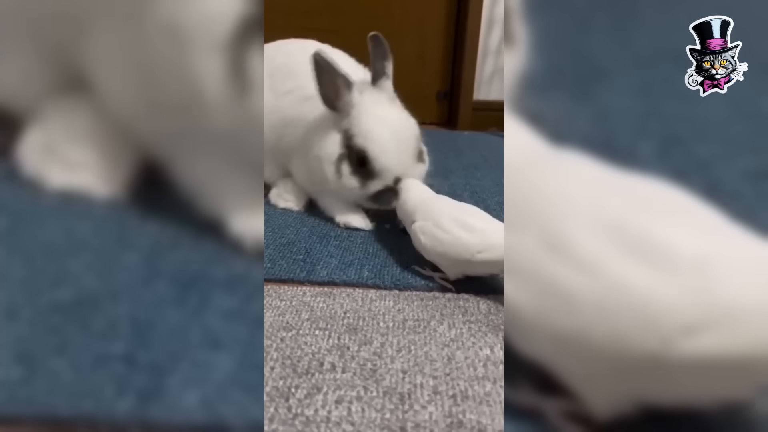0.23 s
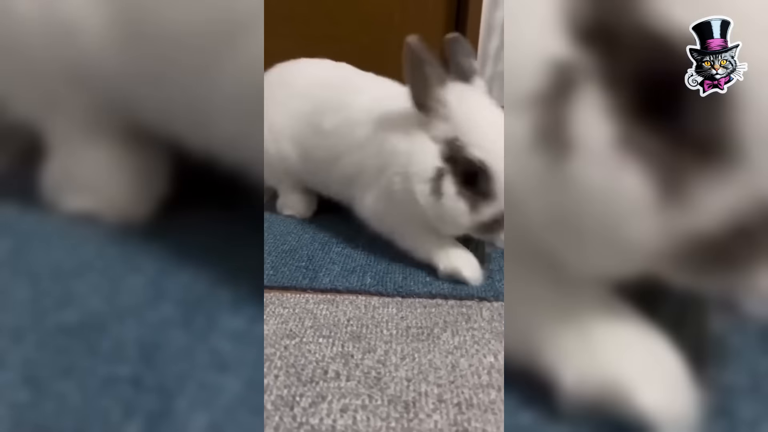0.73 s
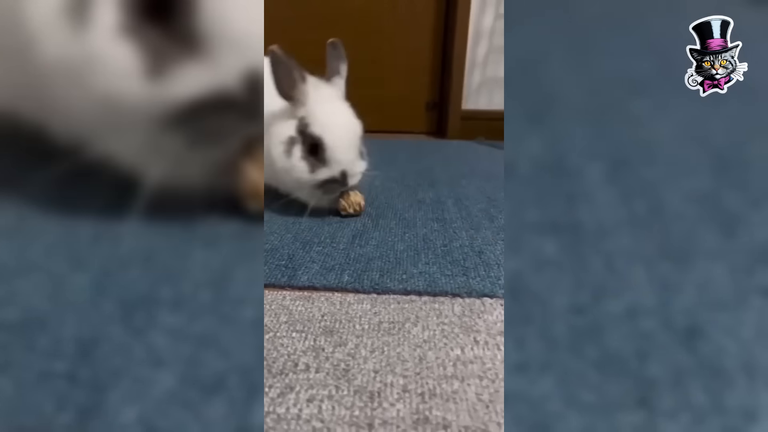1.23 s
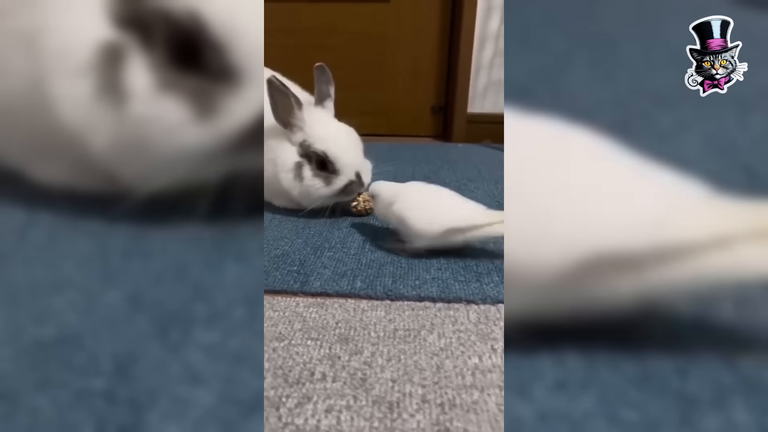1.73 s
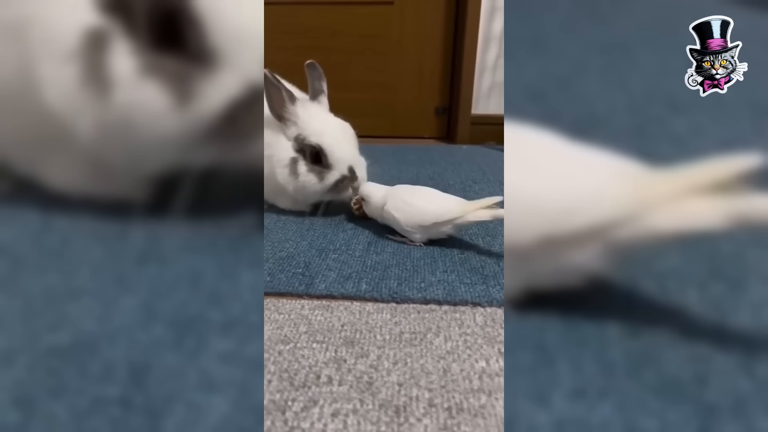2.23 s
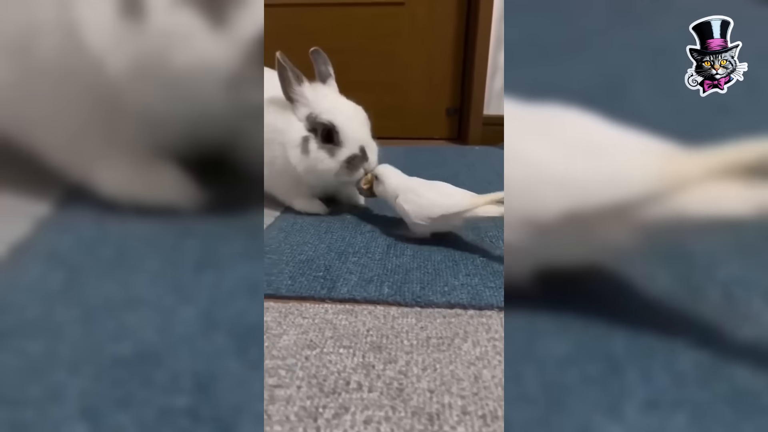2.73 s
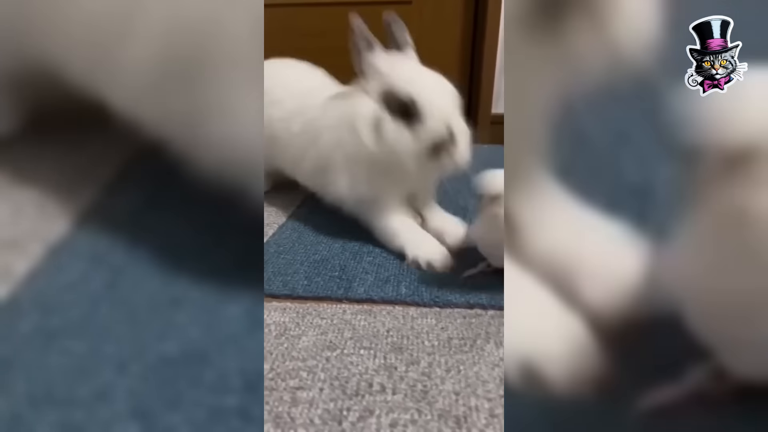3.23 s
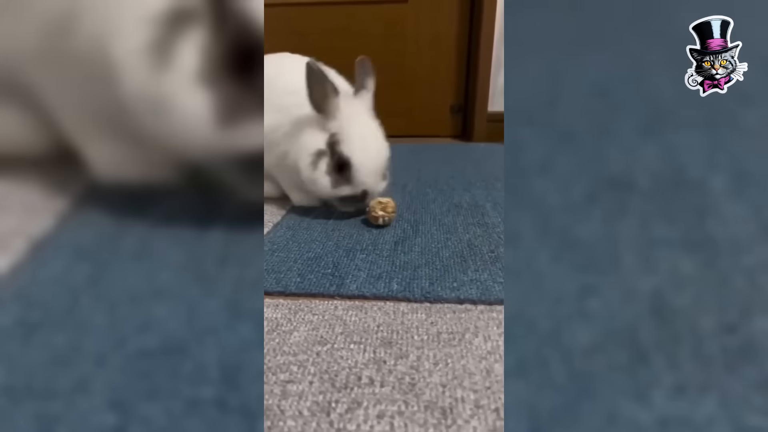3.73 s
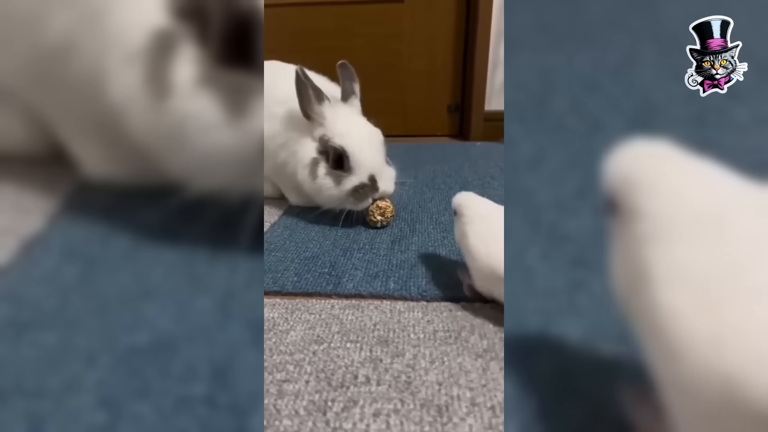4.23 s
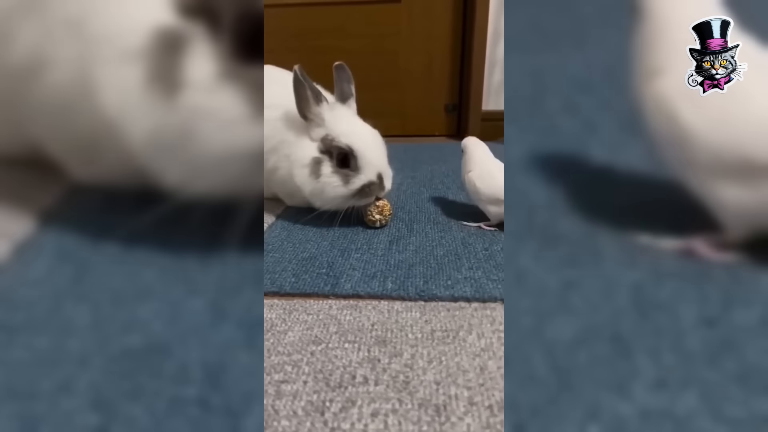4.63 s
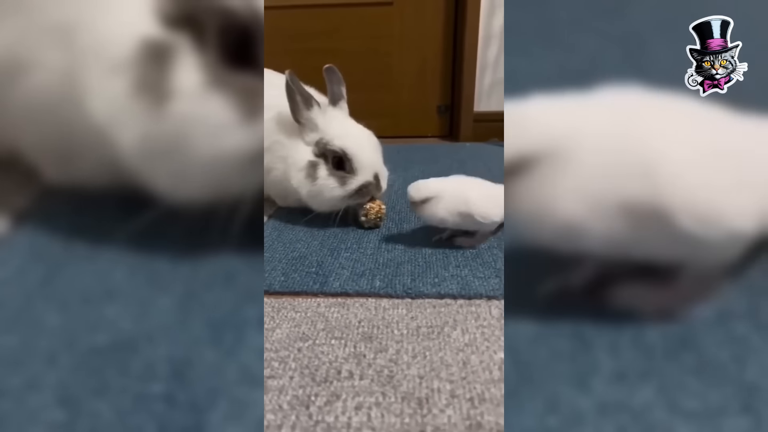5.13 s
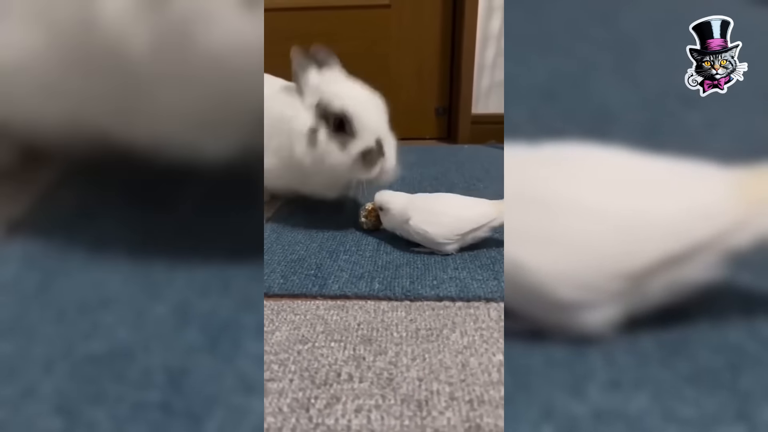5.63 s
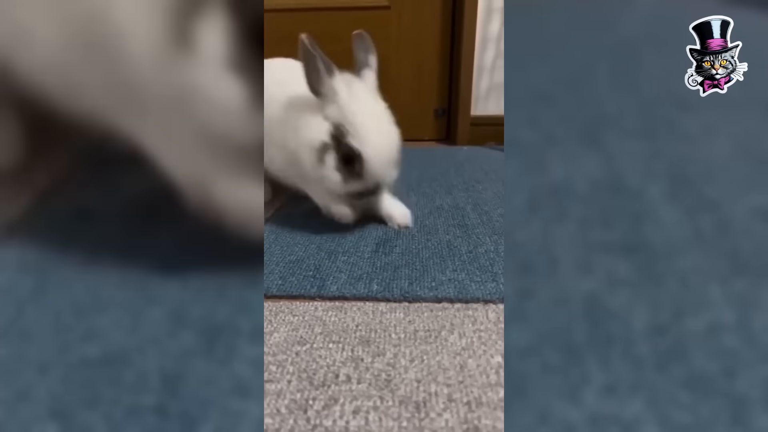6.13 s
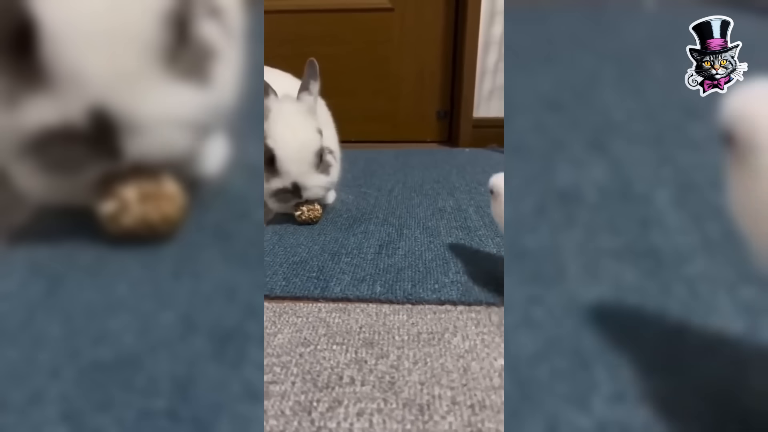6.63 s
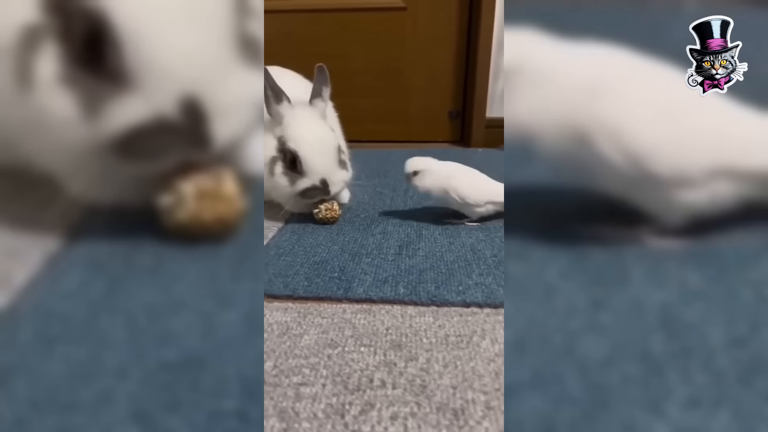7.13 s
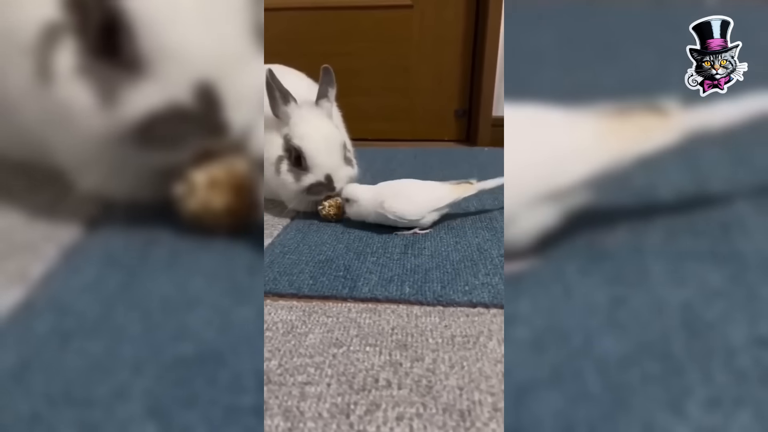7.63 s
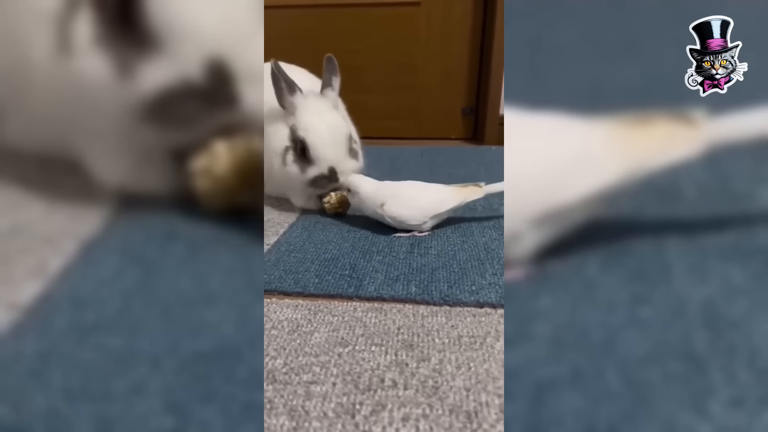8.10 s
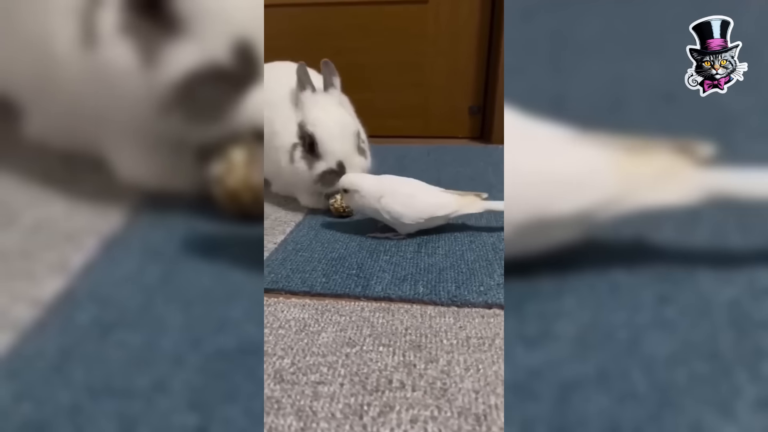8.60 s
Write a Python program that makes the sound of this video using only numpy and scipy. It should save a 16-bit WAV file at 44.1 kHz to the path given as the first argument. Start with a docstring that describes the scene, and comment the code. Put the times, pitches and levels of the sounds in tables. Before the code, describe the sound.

Sparse dry snaps and light padded paw bumps come first, one snap clearly sharper. After a lull, a small bird chatters in short, rough, throbbing chirps, a little right of centre. A crisp crack and fur rustle lead straight into a dull double floor thump, the loudest moment. A few fainter chirps, then quick nibbling cracks. Close stereo microphone, short indoor echo, soft low room rumble.

```python
"""Teeth and beak crack a hard seed ball as a rabbit and a small parrot squabble over it on a carpet.
Noise crumbs around sharp snaps make the cracks; padded pushes on ringing floor modes make the paws,
and the rabbit's lunge ends in two heavy stamps. The bird chatters hoarsely: a throbbing whistle plus
puffed noise in throat, beak and windpipe. Flickering noise bands make the rustle of fur, feathers and
claws; behind it all lie a short room echo and the quiet air of the small room."""
import sys
import numpy as np
from scipy import signal
from scipy.io import wavfile
from scipy.ndimage import uniform_filter1d

SR = 44100
rng = np.random.default_rng(int(sys.argv[2]) if len(sys.argv) > 2 else 0)


def transcribe(signal):
    """Save signal, clipped to [-1, 1], as a 16-bit WAV file at the path in sys.argv[1]."""
    frames = np.atleast_2d(signal).T
    limited = np.clip(frames, -1, 1)
    pcm = np.round(limited * 32767).astype(np.int16)
    wavfile.write(sys.argv[1], SR, pcm)


N = 390806

# Teeth and beak on the ball; thud, crisp and fizz peaks are relative to the body's peak:
# start_s, body_peak_db, thud_db, crisp_db, fizz_db, crumble_ms (time constant, at least 0.5)
BALL_CRACKS = [(.305, -71, 11, -3, -28, 3.1), (.337, -68, 15, -5, -26, 2.9),
               (0.3694, -61.5, -22, -7, -26, 5.9), (0.7314, -45.5, 6.5, -7, -18, 9),
               (1.6212, -46.5, 2.5, -4, -16, 4.8), (1.6541, -53, 0, 4.5, -6, 3),
               (1.694, -21.5, -7, -11, -13.5, 2.1), (1.7065, -29, 1, -13, -10, 0.5),
               (1.7315, -31.5, 2.5, -1.5, -2, 3.3), (1.955, -66, 14, -3, -14, 5.9),
               (2.3134, -56, 11, -1, -3.5, 5.6), (2.353, -60, -3, -6, -24, 2.8),
               (2.3785, -65.5, 16.5, 0, -26, 6.3), (2.9128, -59, -15, -5, -8, 3.3),
               (2.9632, -55, 3, -5, -6, 7.6), (3.1971, -47.5, 11.5, 4.5, -27, 2),
               (3.2675, -30, -3.5, 6, -13, 2.6), (3.6274, -53.5, -6, 3.5, -10, 2),
               (4.785, -43, 4, -4, -29, 3.4), (4.9606, -35.5, -1.5, -14, -2.5, 3.2),
               (5.642, -52, -20, 5, -12, 1.85), (5.686, -42.5, -22, -21, -22, 6.2),
               (5.7443, -18, -27, 1.5, -0.5, 5.8), (5.9599, -47.5, 12, 6, -15, 9.2),
               (6.0931, -49, -22, -4, 3, 4.1), (6.9731, -35, 0, 3, 3, 3.7), (7.2629, -52, 7, -21, -7, 2.4),
               (7.2918, -34, -4, 4, 0.5, 1.7), (7.3417, -41, 3, -18, 0, 5.2),
               (7.3871, -40.5, -19, 0, -4, 5.1), (7.43, -36.5, -3, -22, -10, 2.1),
               (7.4714, -43.5, -24, 4, -4, 2.7), (7.4996, -41, -6, -12, -32, 3.4),
               (7.7711, -47.5, -10, -13, -4.5, 5.4), (7.7927, -42, -3.5, -27, -10, 7.5),
               (7.8183, -35, -3.5, -19.5, -9, 4.4), (7.9274, -32.5, 0.5, -12.5, -34, 1.1),
               (7.9895, -19.5, -5.5, -9, -7, 3), (8.0001, -24.5, -2.5, -1, -0.5, 2.7)]
# Bands in which the ball sounds, in the order thud, body, crisp, fizz: from_hz, to_hz
BALL_BANDS = [(500, 1500), (1500, 3200), (3200, 5700), (6500, 13200)]
# Paws on the floor, push given for a mode right at the centre: middle_s, push_db, centre_hz
PAW_PUSHES = [(0.035, -39, 485), (0.679, -33, 207), (.70, -31, 248), (.715, -26.5, 374), (0.732, -30, 120),
              (1.10, -35.5, 100), (1.574, -42.5, 300), (2.937, -26.5, 146), (3, -34, 124),
              (3.229, -25, 307), (3.237, -28.5, 114), (3.329, -34, 258), (3.399, -30, 254),
              (4.801, -37, 145), (5.694, -35.5, 293), (5.707, -18.5, 284), (5.727, -29, 100),
              (5.767, -23, 208), (5.876, -20, 71.4), (5.964, -15, 456), (5.966, 0.5, 96.5),
              (5.989, -3.5, 84), (5.995, -20.5, 340), (6.01, -13, 118), (6.033, -2, 50.2), (7.801, -39, 99)]
# Ringing modes of the floor: mode_hz, t60_s, left_over_right_db
FLOOR_MODES = [(52.2, 0.09, 3.5), (64, 0.025, -2), (102.4, 0.22, 0), (154, 0.079, 0), (291, 0.077, -4),
               (405, 0.021, -1), (715, 0.018, -4)]
# Bird calls: full_voice_s, attack_db_per_s, hold_s, voice_db, sag_over_hold_db, pitch_hz, glide_hz_per_s,
# clear_share (0-1), throat_db, beak_db, upper_resonance_hz, upper_db, breath_db
BIRD_CALLS = [(4.108, 1105, 0.096, -42.5, 14, 1880, 2002, 0.6, -3, -6.5, 4720, -9, -21),
              (4.25, 480, 0.048, -34.5, 9, 1680, 100.5, 0.6, -17, -13, 3430, -18.5, -25.5),
              (4.434, 450.5, 0.035, -43, 15, 1600, -1500, 0.6, -9, -8, 3750, -16, -22.5),
              (4.57, 704, 0.029, -47.5, 2, 2130, -5000, 0.05, -4.5, -2.5, 3330, -14.5, -24.5),
              (4.716, 550, 0.033, -53, 0, 1660, -10000, 0.61, -3.5, -3.5, 3120, -20.5, -23),
              (4.82, 600.5, 0.096, -40.5, 10.5, 2035, 96.5, .1, -4, -4, 3337, -15, -14),
              (5.102, 1500, 0.034, -47.5, -3.5, 1760, 94, 0.7, -13, -8, 3430, -8, -19),
              (5.138, 609, 0.084, -35, 13, 1773, -1300, 0.53, -20.5, -17.5, 3550, -22.5, -23.5),
              (5.254, 900, 0.014, -41, 1.5, 2150, -4000, 0.1, -11.5, -4, 3410, -23, -31),
              (5.289, 396, 0.059, -37, 9, 1760, -1500, 0.47, -16, -10, 3430, -12, -25.5),
              (6.664, 1000, 0.027, -58.5, -3, 2256, 99.5, .4, -1, -12.5, 3550, -10, -19.5),
              (6.71, 400, 0.087, -49, 8, 2200, 607, 0.6, -4, -9, 3235, -8.5, -16),
              (6.858, 453, 0.026, -38.5, 8, 1340, -600, .7, -11, -6.5, 3660, -14, -22)]
# Airy resonances of the bird's breath: centre_hz, width_hz, level_db
BREATH_RESONANCES = [(7230, 1140, 6.5), (9330, 970, 2), (10900, 3700, -1)]
# Fur, feathers and claws brushing the carpet: full_strength_s, hold_s, level_db, sag_over_hold_db, treble_db
BRUSH_STROKES = [(0.361, 0.026, -73, 4, -13), (0.741, 0.0059, -50.5, 2, -8.5), (.95, 0.21, -76.5, -3, -3.5),
                 (1.718, 0.045, -50, 8.5, -1), (1.96, 0.016, -69, 3, -5), (2.334, 0.035, -68.5, 0.5, -5),
                 (2.55, .25, -72, -0.5, -6), (2.929, 0.058, -66.5, -0.5, -0.5),
                 (3.21, 0.12, -59, 4.5, -2.5), (3.353, 0.15, -69, 2.5, -0.5),
                 (5.537, 0.26, -63.5, 14, -20.5), (5.696, .02, -55, 3, -10.5),
                 (5.745, 0.033, -39.5, 2.5, 2), (5.862, 0.023, -52, 3.5, 2), (5.936, 0.073, -52, 5, 1),
                 (6.032, 0.083, -55.5, 3, 1), (6.156, 0.13, -71, 10.5, -5.5),
                 (6.983, 0.095, -60, 14.5, -5.5), (7.278, .08, -54, -2.5, -3), (7.415, 0.093, -67, -1.5, 1),
                 (7.777, 0.073, -58, -1.5, -5.5), (8.02, 0.028, -60.5, 8, 0), (8.189, 0.034, -75, -1, -4),
                 (8.51, 0.022, -79, 1, -3.5), (8.856, 0.017, -61, 9, -0.5)]
# Colour of the brushing, before scaling to rms 1: frequency_hz, density_db_per_hz
BRUSH_SPECTRUM = [(290, -31), (500, -2), (653, 4.5), (1190, -5.5), (1560, -1.5), (5130, -7), (6330, -5),
                  (12600, -20), (13500, -10.5), (14300, -78)]
# Colour of the room tone, before scaling to rms 1: frequency_hz, density_db_per_hz
AIR_SPECTRUM = [(13, -41), (22, -14.5), (69, -0.5), (132, -13), (313, -6.5), (349, -9), (470, -15),
                (538, -16.5), (1280, -36.5), (2090, -37.5), (3220, -78), (5390, -36), (6170, -56),
                (6880, -50.5), (14300, -66.5)]
# Course of the room tone: time_s, level_db, deep_rumble_db
AIR_COURSE = [(0, -54, 3), (6.7, -53.5, 3), (6.9, -53.5, -10), (7.1, -57, -3), (7.7, -61.5, 5),
              (7.9, -57, 5.5), (8.86, -53.5, 3)]
# How alike the room tone is in both ears: frequency_hz, likeness (1 = identical)
EAR_LIKENESS = [(60, 1.0), (180, 0.98), (530, 0.66), (1570, 0.29), (4660, 0.53), (13800, 0.39)]
# Side to which rustle and room tone lean: frequency_hz, left_over_right_db
EAR_LEAN = [(60, 0.0), (180, 0.0), (530, 0.0), (1570, -2.5), (4660, 0.5), (13800, 0.0)]

BALL_PAN_DB = -1.5   # pans are left over right

THROB_HZ, BUZZ_HZ = 64.8, 171.6
CALL_RELEASE_DB_PER_S = 799.5
THROAT_FADE_DB_PER_S = 119   # the throat rasp thins as a call goes on
THROAT, BEAK = (1300, 670), (2250, 400)   # resonances: centre_hz, width_hz
WINDPIPE_WIDTH_HZ = 320
ROAM = .05   # spread, as a share, of the wandering resonances
BIRD_PAN_DB, BIRD_TREBLE_PAN_DB, BIRD_SPLIT_HZ = -3, 0.5, 2400   # low voice to the right, treble a touch left

BRUSH_ATTACK_DB_PER_S, BRUSH_RELEASE_DB_PER_S = 471.5, 326
FIDGET_DB, FIDGET_SWING_DB, FIDGET_TREBLE_DB = -86, 2.5, -0.5   # the animals never sit quite still
RUSTLE_FLICKER_DB, AIR_FLICKER_DB = 2.5, 1.5
BRUSH_TOP_HZ = 13200

ROOM_T60_S = .19
ROOM_DB, BIRD_ROOM_DB = -11, -6.5   # echo of the close sounds, echo of the bird
CUTOFF_HZ = 14449


def cracks():
    """The seed crust crumbles under rising pressure, snaps, and crumbles out."""
    out, lead, n = np.zeros((2, N)), 600, 2600   # samples before the snap, samples in all
    ms = 1000 * (np.arange(n) - lead) / SR
    for s, body_db, thud_db, crisp_db, fizz_db, crumble_ms in BALL_CRACKS:
        crumble_ms = max(crumble_ms, .5)
        crumbs = rng.standard_normal((3, n)) * from_db(7.34 * rng.standard_normal(n))
        shape = np.exp(np.where(ms < 0, ms / (0.59 * crumble_ms), -ms / crumble_ms))
        # crumbs scatter a little between the ears
        splinter = 0.21 * shape * (crumbs[0] + 0.22 * crumbs[1:])
        splinter[:, lead] = 1   # the snap itself
        parts = [band(splinter, *edges) for edges in BALL_BANDS]
        levels_db = [thud_db, 0, crisp_db, fizz_db]
        snap = sum(from_db(db) * part / np.abs(part).max() for db, part in zip(levels_db, parts))
        at = round(s * SR) - lead
        out[:, at:at + n] += panned(from_db(body_db) * snap, BALL_PAN_DB)[:, :N - at]
    return out


def paws():
    """A padded paw presses for about one cycle of the modes it stirs: heavy pushes are slow and deep."""
    out = np.zeros((2, N))
    for hz, t60, pan_db in FLOOR_MODES:
        pushes = np.zeros(N)
        for s, push_db, centre_hz in PAW_PUSHES:
            pad = np.hanning(round(.7 * SR / max(centre_hz, hz)))
            at = round(s * SR) - len(pad) // 2
            # modes far from the paw's centre are stirred less
            octaves_off = np.abs(np.log2(hz / centre_hz))
            strength = from_db(push_db - 14.8 * octaves_off ** 1.2)
            pushes[at:at + len(pad)] -= pad / pad.sum() * strength
        out += panned(ring(pushes, hz, t60), pan_db)
    return out


def chatter():
    """An unsteady whistle that throbs, and a buzzy rasp in the resonances of throat, beak and windpipe."""
    calls = loudest(BIRD_CALLS, CALL_RELEASE_DB_PER_S)
    voice_db, age, hz, glide, clear, throat_db, beak_db, upper_hz, upper_db, breath_db = calls
    clear = np.clip(clear, 0, 1)
    glide_age = np.maximum(age, -.04)
    hz = hz + glide * glide_age
    throat_db = throat_db - THROAT_FADE_DB_PER_S * glide_age
    # the syrinx flutters: the whistle swells and chokes many times a second
    phase = cycling(hz, .012, 60)
    throb = 1 + 0.35 * np.sin(cycling(THROB_HZ, 0.22, 8))
    harmonics = np.sin(phase) + 0.07 * np.sin(2 * phase) + 0.03 * np.sin(3 * phase)
    whistle = rms_one(throb * harmonics)
    # its membranes slap shut and chop the air into puffs, which stacks fine lines around each resonance
    puffs = rms_one(np.exp(.55 * np.cos(cycling(BUZZ_HZ, .2, 25))))
    roam = 1 + ROAM * drift(8)
    hoarse = np.sqrt(1 - clear) * wavering(hz, 250)   # noise around the pitch
    throat = from_db(throat_db) * wavering(THROAT[0] * roam, THROAT[1])
    beak = from_db(beak_db) * wavering(BEAK[0] / roam, BEAK[1])
    windpipe = wavering(upper_hz * roam, WINDPIPE_WIDTH_HZ) + 0.71 * wavering(4250, 2660)
    rasp = puffs * (hoarse + throat + beak + from_db(upper_db) * windpipe)
    breath = rms_one(sum(from_db(db) * wavering(f, width) for f, width, db in BREATH_RESONANCES))
    grit = from_db(2.0 * drift(60))
    voice = np.sqrt(clear) * whistle + grit * (rasp + from_db(breath_db) * breath)
    voice = from_db(voice_db) * voice
    low_voice = panned(band(voice, 300, BIRD_SPLIT_HZ), BIRD_PAN_DB)
    treble = panned(band(voice, BIRD_SPLIT_HZ, 14000), BIRD_TREBLE_PAN_DB)
    return low_voice - treble


def rustle():
    """Patchy brushing, gritty where hairs and claws catch the pile."""
    strokes = [(s, BRUSH_ATTACK_DB_PER_S, *rest) for s, *rest in BRUSH_STROKES]
    level_db, _, treble_db = loudest(strokes, BRUSH_RELEASE_DB_PER_S)
    # between strokes a faint fidgeting remains
    treble_db = np.where(level_db > FIDGET_DB, treble_db, FIDGET_TREBLE_DB)
    level_db = np.maximum(level_db, FIDGET_DB + FIDGET_SWING_DB * drift(2.6))
    brush = banded_noise(BRUSH_SPECTRUM, RUSTLE_FLICKER_DB, 6000, 0, treble_db, lambda hz: .7)
    brush = signal.sosfilt(signal.butter(12, BRUSH_TOP_HZ, fs=SR, output="sos"), brush)
    catches = from_db(2.2 * drift(150))
    return from_db(level_db) * rms_one(brush * catches)


def room(x):
    """A dying noise for each ear stands for the many wall echoes."""
    t = np.arange(round(ROOM_T60_S * SR)) / SR
    tail = band(rng.standard_normal((2, len(t))), 200, 11000)
    tail *= from_db(-60 * t / ROOM_T60_S) * (t > .003)   # the first echo waits 3 ms
    tail /= np.sqrt(np.sum(tail ** 2, axis=1, keepdims=True))
    return from_db(ROOM_DB) * signal.fftconvolve(x, tail, axes=1)[:, :N]


def room_tone():
    """Ventilation and building rumble with a faint hiss, as flickering noise bands."""
    level_db, deep_db = in_time(AIR_COURSE)
    air = banded_noise(AIR_SPECTRUM, AIR_FLICKER_DB, 140, deep_db, 0, lambda hz: at_hz(EAR_LIKENESS, hz))
    return from_db(level_db) * air


def banded_noise(spectrum, patchy_db, split_hz, below_db, above_db, alike_at):
    """Half-octave bands of stereo noise, each flickering on its own; one gain below the split, one above."""
    out, edges = 0, 22 * 2 ** np.arange(0, 9.6, .5)
    white = rng.standard_normal((2, 2, N))
    sides = np.array([[1], [-1]])
    for k, (low, high) in enumerate(zip(edges, edges[1:])):
        hz = np.sqrt(low * high)
        if hz < spectrum[0][0]:
            continue
        mid, side = band(white[k % 2], low, high)   # neighbouring bands use separate noise
        alike = np.clip(alike_at(hz), -1, 1)
        split_db = below_db if hz < split_hz else above_db
        gain = from_db(at_hz(spectrum, hz) + patchy_db * drift(30) + split_db)
        pair = np.sqrt(1 + alike) * mid + np.sqrt(1 - alike) * side * sides
        out = out + gain * pair * from_db(at_hz(EAR_LEAN, hz) / 2 * sides)
    return rms_one(out)


def loudest(rows, fall_db_per_s):
    """Attack, sagging hold, release for every row; the loudest row of the moment gives level, age and columns."""
    s, rise, hold, db, sag_db, *columns = np.transpose(rows)[:, :, None]
    t = np.arange(0, N + 32, 32) / SR   # one step per 32 samples
    age, hold = t - s, np.maximum(hold, .002)
    attack = rise * np.minimum(age, 0)
    sag = sag_db * np.clip(age / hold, 0, 1)
    release = fall_db_per_s * np.maximum(age - hold, 0)
    level = db + attack - sag - release
    top, step = level.argmax(axis=0), np.arange(len(t))
    held_age = np.minimum(age, hold)
    slow = [level[top, step], held_age[top, step], *[c[top, 0] for c in columns]]
    # smoothing softens the jump from row to row
    return [np.interp(np.arange(N) / SR, t, uniform_filter1d(c, size=7)) for c in slow]


def wavering(hz, width_hz):
    """Noise inside a resonance whose centre may move; rms 1."""
    low = signal.butter(4, np.clip(width_hz / 2, 10, 2000), fs=SR, output="sos")
    slow = signal.sosfilt(low, rng.standard_normal(N) + 1j * rng.standard_normal(N))
    carrier = np.exp(2j * np.pi * np.cumsum(hz + np.zeros(N)) / SR)
    return rms_one(np.real(slow * carrier))


def cycling(hz, wobble, rate):
    """Phase of an oscillation whose frequency wanders."""
    return 2 * np.pi * np.cumsum(hz * (1 + wobble * drift(rate))) / SR


def drift(rate):
    """Slow random wandering with spread 1, mostly below rate in Hz."""
    r = np.exp(-40 * np.pi * rate / SR)   # one step per 20 samples
    steps = rng.standard_normal(N // 20 + 2002)
    slow = signal.lfilter([1], [1, -2 * r, r * r], steps)[2000:]   # skip the filter's start
    return np.interp(np.arange(N) / 20, np.arange(len(slow)), rms_one(slow))


def ring(x, hz, t60):
    """A unit click sets a sine of height 1 ringing; it dies by 60 dB in t60 seconds."""
    r, w = from_db(-60 / (t60 * SR)), 2 * np.pi * hz / SR
    return signal.lfilter([0, np.sin(w)], [1, -2 * r * np.cos(w), r * r], x + 1e-18)


def band(x, low_hz, high_hz):
    """Band-pass."""
    return signal.sosfilt(signal.butter(2, [low_hz, high_hz], "band", fs=SR, output="sos"), x)


def panned(x, pan_db):
    """Left over right by pan_db."""
    return x * from_db(np.outer([.5, -.5], pan_db))


def in_time(rows):
    """Columns of a curve over time."""
    s, *columns = np.transpose(rows)
    return [np.interp(np.arange(N) / SR, s, c) for c in columns]


def at_hz(points, hz):
    """Read a spectrum on a log axis."""
    points = np.array(points)
    return np.interp(np.log(hz), np.log(points[:, 0]), points[:, 1])


def rms_one(x):
    """Scale to rms 1."""
    return x / np.sqrt(np.mean(x ** 2) + 1e-20)


def from_db(db):
    """Gain of a level."""
    return 10 ** (np.asarray(db) / 20)


def scene():
    """The ball, the animals, their echo and the room tone."""
    close, bird = cracks() + paws(), chatter()
    echo = room(close + from_db(BIRD_ROOM_DB - ROOM_DB) * bird)
    return close + bird + echo + rustle() + room_tone()


def record(dry):
    """The treble has a narrow dip near 6 kHz, the deepest bass is dropped; the top is cut."""
    b, a = signal.iirnotch(6050, 5.5, fs=SR)
    dipped = signal.lfilter(b, a, dry)
    lean_bass = signal.sosfilt(signal.butter(2, 40, "high", fs=SR, output="sos"), dipped)
    return signal.sosfilt(signal.ellip(10, .5, 60, CUTOFF_HZ, fs=SR, output="sos"), lean_bass)


dry = scene()
out = record(dry)
transcribe(out)
```